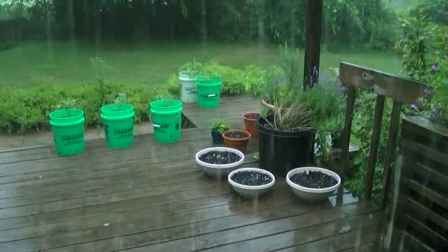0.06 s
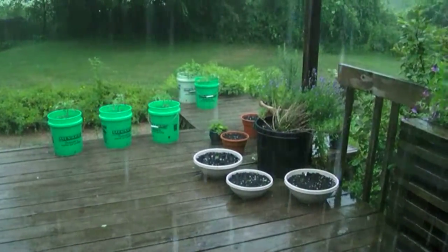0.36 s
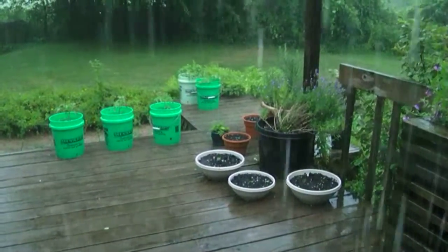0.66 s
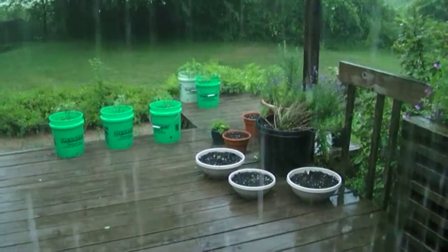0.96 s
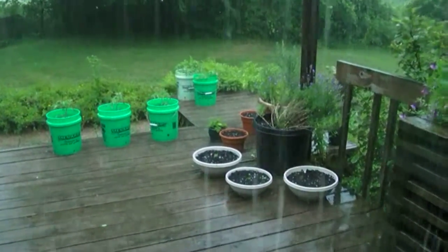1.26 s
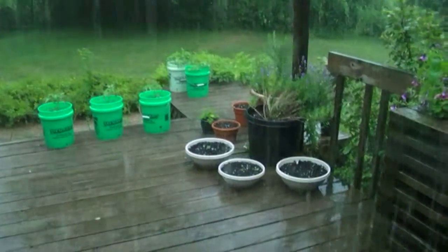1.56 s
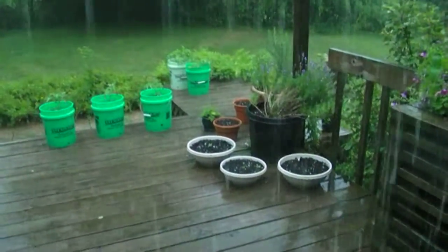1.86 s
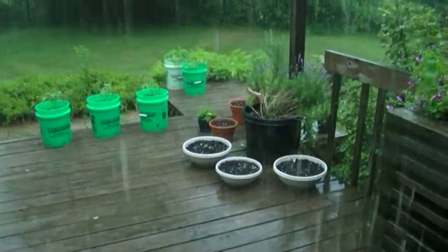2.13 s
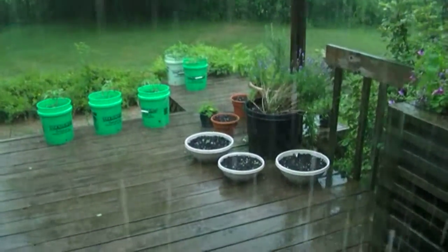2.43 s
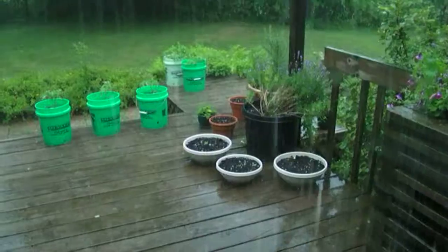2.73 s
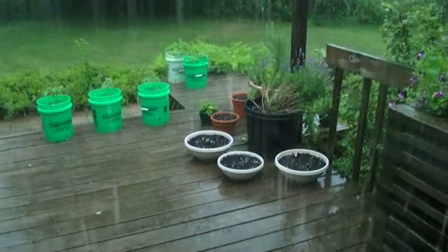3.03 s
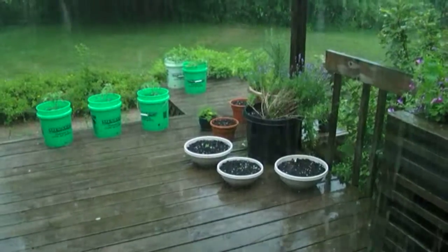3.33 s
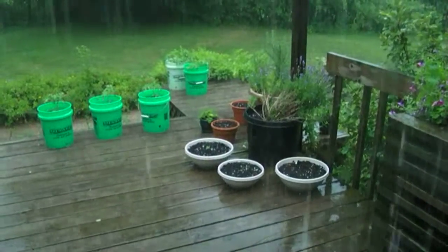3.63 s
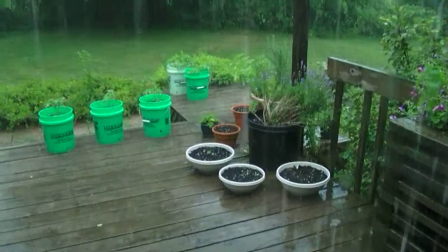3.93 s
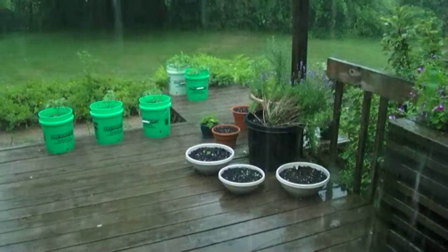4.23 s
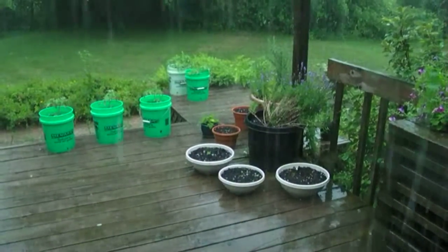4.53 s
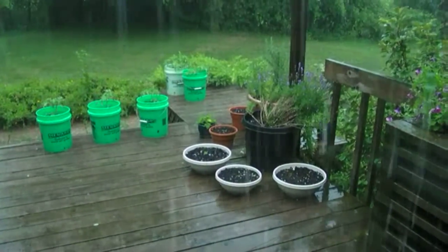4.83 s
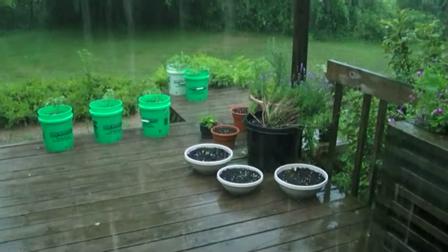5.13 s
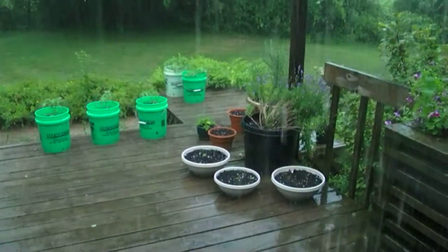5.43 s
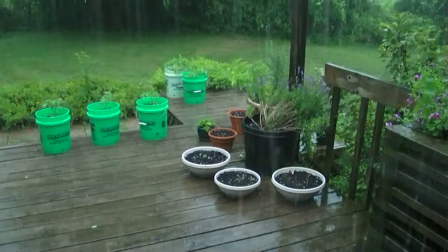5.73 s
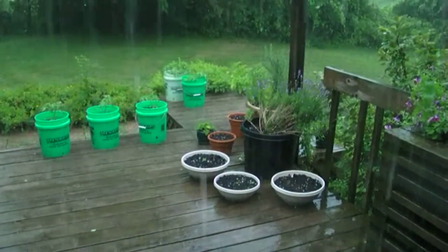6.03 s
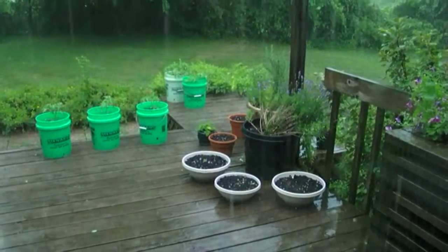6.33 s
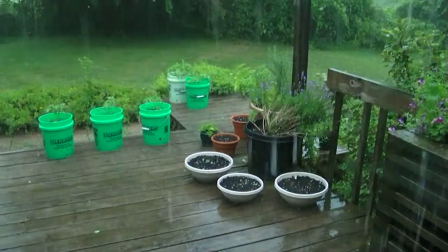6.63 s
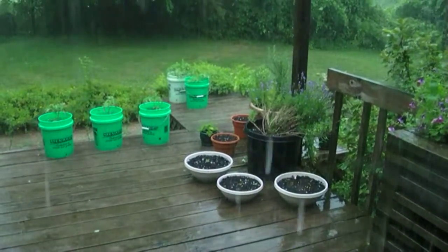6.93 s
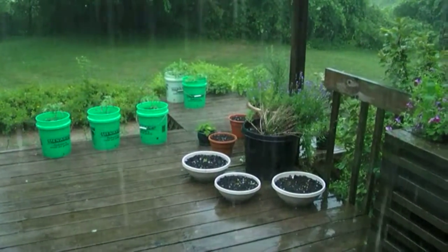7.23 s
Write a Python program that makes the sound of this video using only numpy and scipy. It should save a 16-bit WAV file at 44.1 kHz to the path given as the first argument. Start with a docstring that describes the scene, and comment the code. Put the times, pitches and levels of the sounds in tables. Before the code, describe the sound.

Heavy rain falls on a wooden deck for about seven seconds, heard from under the eaves. Distant drops merge into an even wash, while nearer ones tap densely on wet boards, drum hollow notes from plastic buckets and add bright pings and a fine crackle. Small splashes in standing water are scattered throughout, clustering between 3 and 4 seconds and again after 6. The rain eases slightly around 2.4 and 4.1 seconds. Fat drops smack on hard plastic close to the microphone at about 0.4, 0.9, 1.2 and 1.7 seconds. A low rumble lies underneath, swelling at 3 seconds and sinking back by 4.2. At 4.8 seconds, by far the hardest drop cracks on the plastic and briefly distorts; everything turns quieter for about half a second, then creeps back. Lighter smacks follow near 6.1 and 6.8 seconds, and the rain continues to the end.

```python
"""A wooden deck in heavy rain, with plastic buckets standing on it; microphone under the eaves. Far drops merge
into a wash; nearer ones patter on the boards, drum on the buckets, ping brightly and splash in standing water.
The patter follows one downpour; a low rumble beneath swells once. Fat drops smack on plastic close to the
microphone; the hardest overloads the recorder, whose gain control ducks for about 0.7 s."""
import sys
import numpy as np
from scipy import signal
from scipy.fft import rfft, irfft
from scipy.io import wavfile
from scipy.ndimage import map_coordinates

SR = 44100
rng = np.random.default_rng(int(sys.argv[2]) if len(sys.argv) > 2 else 0)


def dump_mix(stems):
    """Bounce the given channels to the path in sys.argv[1] as a 16-bit WAV at rate SR."""
    frames = np.atleast_2d(stems).T  # one column per channel
    limited = np.clip(frames, -1, 1)  # hard clip at full scale
    pcm = np.round(limited * 32767).astype(np.int16)
    wavfile.write(sys.argv[1], SR, pcm)


N = 321048


def amp(db):
    """Decibels to gain."""
    return 10 ** (np.asarray(db) / 20)


def unit(x):
    """Scale to rms 1."""
    return x / np.sqrt(np.mean(x ** 2) + 1e-20)


def wobble(rate):
    """A smooth random curve, rate knots a second."""
    return map_coordinates(rng.standard_normal(int(N * rate / SR) + 4), [np.arange(N) * rate / SR])


def coloured(x, spectrum, size=8192):
    """x through the causal filter that has this spectrum (f/Hz, level/dB)."""
    hz, db = np.transpose(spectrum)
    bin_db = np.interp(np.log(np.fft.rfftfreq(size, 1 / SR) + 1), np.log(hz + 1), db)
    cepstrum = irfft(np.log(amp(bin_db)))
    cepstrum[1:size // 2] *= 2  # fold to minimum phase
    cepstrum[size // 2 + 1:] = 0
    return signal.fftconvolve(x, irfft(np.exp(rfft(cepstrum))))[:N]


def fade(t60):
    """A quarter second of exponential decay."""
    return 1000 ** (-np.arange(SR // 4) / SR / t60)


def ring(hz, t60):
    """One damped mode."""
    return fade(t60) * np.sin(2 * np.pi * hz * np.arange(SR // 4) / SR)


def add(track, s, sound):
    """Mix a sound into the track at time s."""
    room = track[int(s * SR):][:len(sound)]
    room += sound[:len(room)]


def impacts(rate, spread_db):
    """Drops landing at random, rate a second: many small, a few large."""
    lands = rng.random(N) < rate / SR
    return lands * amp(spread_db * np.minimum(rng.standard_normal(N), 2))


def patter(rate, spread_db, splash_t60, wash_db):
    """Each impact bursts into a short spray; the far drops merge into a wash beneath."""
    energy = np.abs(signal.fftconvolve(impacts(rate, spread_db) ** 2, fade(splash_t60) ** 2)[:N])
    near = unit(np.sqrt(energy) * rng.standard_normal(N))
    return near + amp(wash_db) * rng.standard_normal(N)


def struck_mode(hz, t60, rate):
    """One damped mode, rung by its own random drops."""
    kicks = impacts(rate, spread_db=4) * rng.choice([-1, 1], N)
    return signal.fftconvolve(kicks, ring(hz, t60))[:N]


# Spectrum of the background rumble: f/Hz, relative level/dB
RUMBLE_SPECTRUM = [(10, -16), (25, -6), (48, -5), (72, -1.5), (115, 1.5), (200, -4), (400, -29),
                   (1500, -74)]
def rumble(level_db=-30.4, swell_db=4.8, swell_at_s=2.99):
    """A low, slowly heaving rumble under the downpour; once it rises, holds and sinks back."""
    corners_s = swell_at_s + np.cumsum([0, 0.16, 0.62, 0.45])  # rise, hold, fall
    swell = np.interp(np.arange(N) / SR, corners_s, [0, 1, 1, 0])
    gain = amp(level_db + swell_db * swell + 0.8 * wobble(6))
    return gain * unit(coloured(rng.standard_normal(N), RUMBLE_SPECTRUM))


# Spectrum of the wet boards, near and far: f/Hz, relative level/dB
BOARD_SPECTRUM = [(40, -25.5), (130, -8.5), (270, 0.5), (440, -2.5), (720, -2), (870, -3.5), (1150, -4.5),
                  (1650, -7), (2200, -7), (2700, -12.5), (3300, -22.5), (5000, -35)]
def deck():
    """Dull taps on the wet boards, so dense that they almost merge."""
    taps = patter(rate=2200, spread_db=2.5, splash_t60=0.0068, wash_db=4)
    return unit(coloured(taps, BOARD_SPECTRUM))


# Modes of the buckets out on the deck: f/Hz, relative level/dB, t60/s
BUCKET_MODES = [(188.5, -2, .12), (257, -0.5, 0.17), (309, -4.5, 0.11), (619.5, -2, 0.072),
                (686, -1.5, 0.061), (755.4, 0.5, .08)]
def buckets():
    """Drops drum on the buckets and ring their hollow notes."""
    return unit(sum(amp(db) * unit(struck_mode(hz, t60, rate=70)) for hz, db, t60 in BUCKET_MODES))


# Tone of the bright patter at the microphone, peaking near 2.2 kHz: f/Hz, relative level/dB
BRIGHT_PATTER_TONE = [(1200, -37), (1850, -15.5), (2050, -3.5), (2200, 1.5), (2350, 0), (2600, -7),
                      (2950, -27), (3500, -27), (6000, -46.5)]
def bright_patter():
    """Bright patter and short pings of drops, ringing near 2.2 kHz."""
    taps = patter(rate=900, spread_db=3.5, splash_t60=0.0061, wash_db=1.5)
    blur = unit(coloured(taps, BRIGHT_PATTER_TONE))
    ping_modes = [(2130, 0.027), (2230, 0.019), (2340, 0.013)]
    pings = unit(sum(struck_mode(hz, t60, rate=40) for hz, t60 in ping_modes))
    return unit(blur + amp(-6.5) * pings) * amp(0.7 * wobble(12))


# Tone of the fine rain crackle as the microphone hears it, brightest near 4.2 kHz:
# f/Hz, relative level/dB
CRACKLE_TONE = [(1500, -26.5), (3200, -17.5), (3600, -1.5), (3950, 2.5), (4400, 2.5), (5000, -5.5),
                (6200, -5.5), (7400, -7.5), (9000, -14.5)]
def crackle():
    """Drops burst on the film of water and throw off a fine crackle."""
    bursts = patter(rate=160, spread_db=7.5, splash_t60=0.035, wash_db=3)
    ticks = unit(impacts(rate=580, spread_db=5) * rng.choice([-1, 1], N))
    return unit(coloured(bursts + amp(-3) * ticks, CRACKLE_TONE)) * amp(0.7 * wobble(8))


def plip(hz, t60, fall, fall_s):
    """The pocket of air under a splash rings briefly; its pitch falls as the crater widens."""
    t = np.arange(SR // 25) / SR
    settling = np.exp(-t / fall_s)
    phase = 2 * np.pi * np.cumsum(hz * (1 + fall * settling)) / SR
    tone = np.sin(phase) * fade(t60)[:len(t)] * (1 - settling)
    return tone / np.abs(tone).max()


def splash(hz):
    """A plip, a second smaller one just after it, and a short sizzle of droplets."""
    second_hz = hz * np.exp(0.1 * rng.standard_normal())
    delay_s, fall = rng.uniform(0.004, 0.011), rng.uniform(0, 0.36)
    band = signal.butter(3, [0.85 * hz, 1.3 * hz], 'band', fs=SR, output='sos')
    sizzle = signal.sosfilt(band, rng.standard_normal(SR // 4))
    out = amp(-10.5) * unit(sizzle) * fade(t60=0.094)
    add(out, 0, plip(hz, t60=0.0088, fall=fall, fall_s=0.00081))
    add(out, delay_s, amp(-8.5) * plip(second_hz, t60=0.009, fall=fall / 2, fall_s=0.0021))
    return out


# Splashes nearest the microphone: t/s, relative level/dB, f/Hz
NEAR_SPLASHES = [(0.2628, -15, 4350), (0.5511, -12, 4440), (1.3094, -12.5, 4160), (1.6796, -14, 6160),
                 (3.0749, -14, 3830), (3.2036, -12.5, 4230), (3.5465, -14, 4380), (3.6775, -13.5, 4000),
                 (3.8124, -13, 4520), (4.2847, -15, 4400), (5.3413, -14, 4670), (6.0761, -14, 3940),
                 (6.1739, -13, 3930), (6.4238, -11.5, 3860), (6.4966, -15.5, 4180), (7.1242, -16, 3890)]
def splashes(far_count=110, faintest_db=-29, lowest_hz=3840):
    """Near drops land in the standing water on the deck; fainter ones fall farther off."""
    out = np.zeros(N)
    for s, db, hz in NEAR_SPLASHES:
        add(out, s, amp(db - 4.5) * splash(hz))
    for when, size, pitch in rng.random(size=(far_count, 3)):
        db = faintest_db + 8 * size ** 2  # most stay faint
        hz = lowest_hz + 1100 * pitch ** 3  # a few ring higher
        add(out, when * N / SR, amp(db) * splash(hz))
    return out


# Modes of the hard plastic close to the microphone: f/Hz, relative level/dB, t60/s
PLASTIC_MODES = [(1400, -9, 0.019), (1930, -2.5, 0.014), (2266, 7.5, 0.02), (2650, -2, .016),
                 (3240, -9.5, 0.0089), (6130, -1.5, 0.005)]
# Fat drops landing on it: t/s, level/dB
FAT_DROPS = [(0.446, -8), (0.932, -6.5), (0.942, -7), (1.225, -8), (1.717, -9.5), (4.8205, 6), (4.830, -5),
             (6.085, -7.5), (6.755, -8), (6.766, -9.5)]
def smacks(eaves_delay_s=0.004, eaves_db=-4, eaves_top_hz=3800):
    """A fat drop cracks on plastic; the wall and eaves answer a moment later, duller."""
    out = np.zeros(N)
    dull = signal.butter(2, eaves_top_hz, fs=SR, output='sos')
    modes = sum(amp(db) * ring(hz, t60) for hz, db, t60 in PLASTIC_MODES)
    for s, db in FAT_DROPS:
        crack = amp(-14) * fade(t60=0.012) * rng.standard_normal(len(modes))
        blow = modes / np.abs(modes).max() + crack
        eaves = fade(t60=0.17) * rng.standard_normal(len(blow))
        answer = signal.fftconvolve(blow, eaves / np.linalg.norm(eaves))[:len(blow)]
        add(out, s, amp(db) * blow)
        add(out, s + eaves_delay_s, amp(db + eaves_db) * signal.sosfilt(dull, answer))
    return out


# Strength of the downpour on the deck: t/s, level/dB about its usual strength
DOWNPOUR = [(0.0, 0.6), (0.55, 1.5), (0.95, 1.8), (1.4, 0.3), (1.9, 0.95), (2.4, -2), (2.75, -0.55),
            (3.65, 0.95), (4.1, -2.5), (4.65, -0.5), (5.8, 0.67), (6.6, -1.0), (7.28, 0.7)]
def scene(deck_db=-20, buckets_db=-27, bright_db=-25.5, crackle_db=-32):
    """From under the eaves: four layers of rain swell and ease together behind the close drops."""
    rain_db = np.interp(np.arange(N) / SR, *np.transpose(DOWNPOUR))
    rain = amp(deck_db + rain_db) * deck()
    rain += amp(buckets_db + rain_db) * buckets()
    rain += amp(bright_db + 1.15 * rain_db) * bright_patter()
    rain += amp(crackle_db + 0.35 * rain_db) * crackle()
    return (rain + rumble() + splashes() + smacks())[None]


def gain_control(x, threshold_db, depth_db, attack_s, hold_s, release_s):
    """An overload turns the gain down; it stays down a moment and then creeps back."""
    t = np.arange(N) / SR
    overloaded = np.abs(x) > amp(threshold_db)
    since_s = t - np.maximum.accumulate(np.where(overloaded, t, -np.inf))
    duck = np.clip(1 - (since_s - hold_s) / release_s, 0, 1)
    pole = np.exp(-1 / (attack_s * SR))
    return x * amp(-depth_db * signal.lfilter([1 - pole], [1, -pole], duck))


# Response of the microphone, rolling off in the treble: f/Hz, level/dB
MIC_RESPONSE = [(7200, 2), (7600, 0.5), (8000, -1.5), (8400, -7.5), (8750, -17.5), (9100, -35.5),
                (9600, -71)]
def record(dry, top_hz=15800):
    """The mono microphone loses the top treble; the recorder ducks after an overload, and clips."""
    x = coloured(dry[0], MIC_RESPONSE)
    x = gain_control(x, threshold_db=3.0, depth_db=4.5, attack_s=0.04, hold_s=0.2, release_s=0.48)
    x = np.clip(x, -0.7, 0.7)
    passband = np.fft.rfftfreq(N, 1 / SR) < top_hz
    return irfft(rfft(x) * passband, N)[None]


dry = scene()
out = record(dry)
dump_mix(out)
```